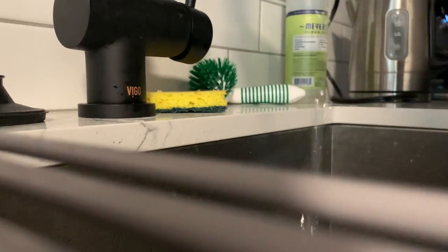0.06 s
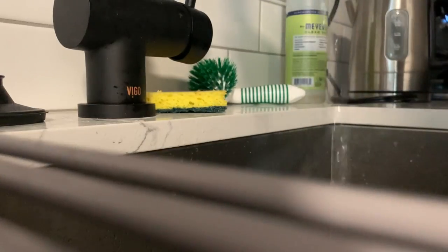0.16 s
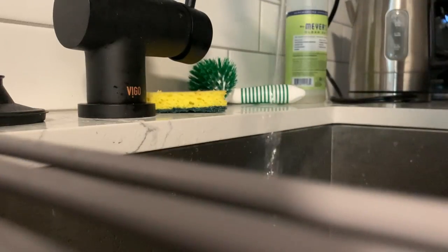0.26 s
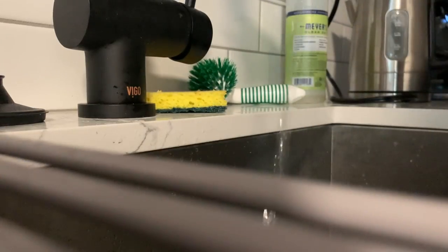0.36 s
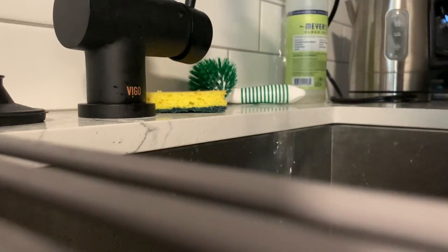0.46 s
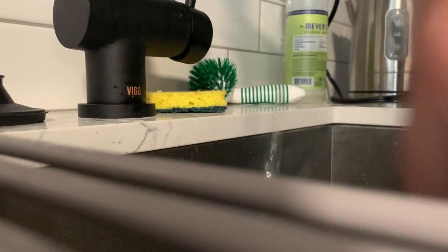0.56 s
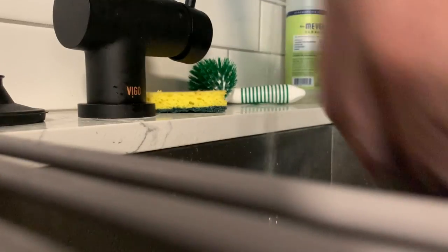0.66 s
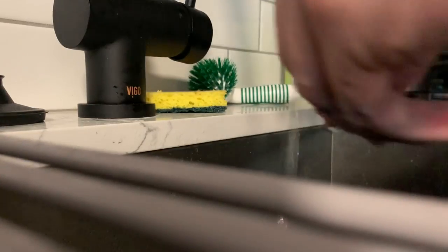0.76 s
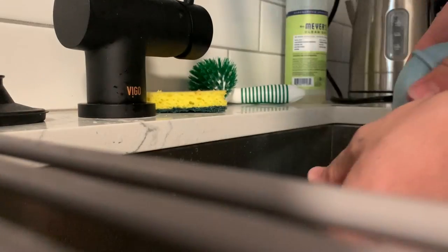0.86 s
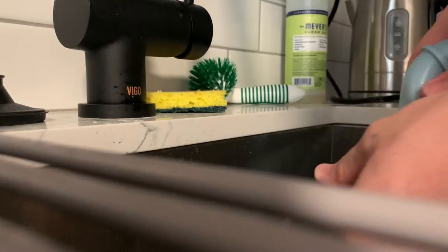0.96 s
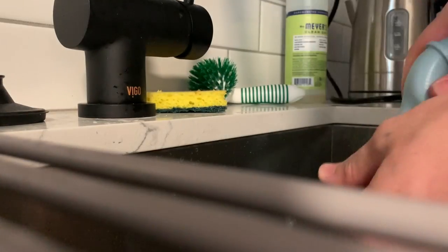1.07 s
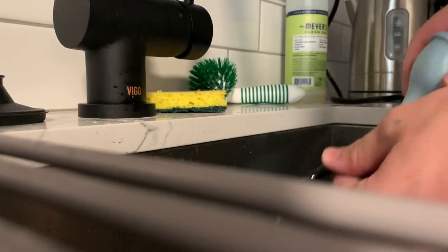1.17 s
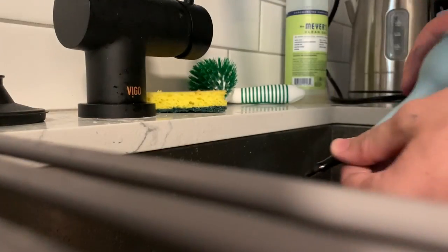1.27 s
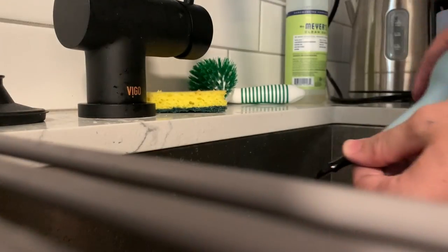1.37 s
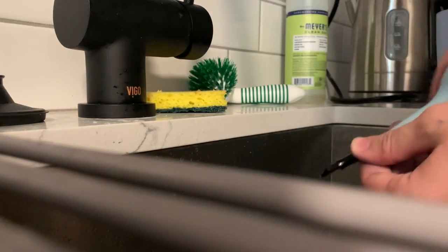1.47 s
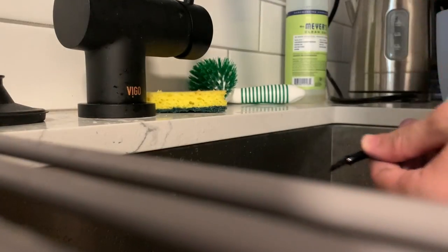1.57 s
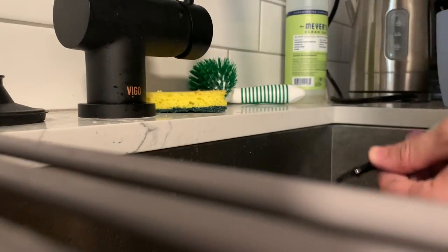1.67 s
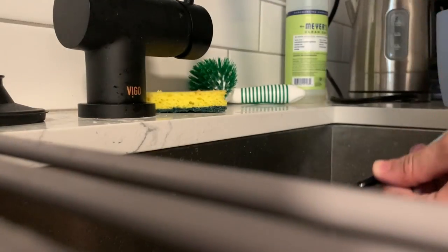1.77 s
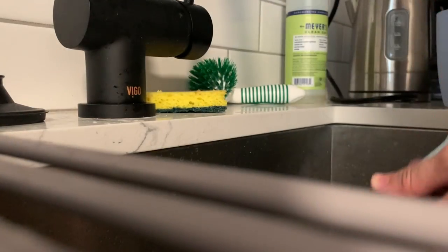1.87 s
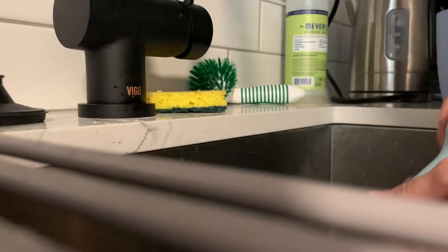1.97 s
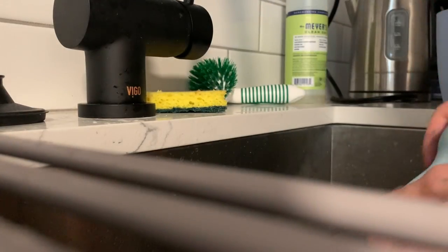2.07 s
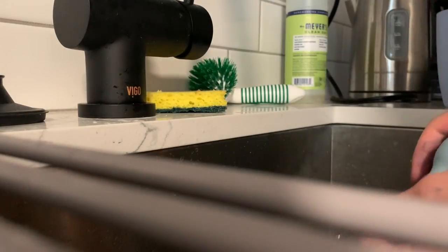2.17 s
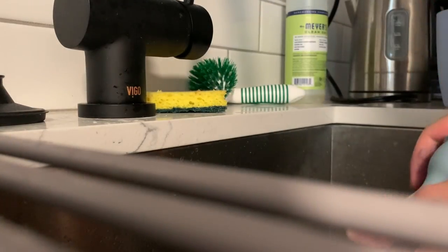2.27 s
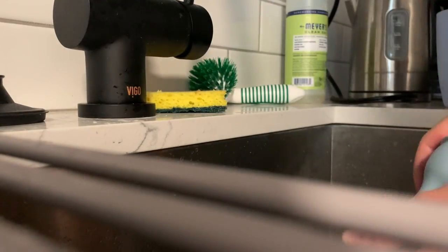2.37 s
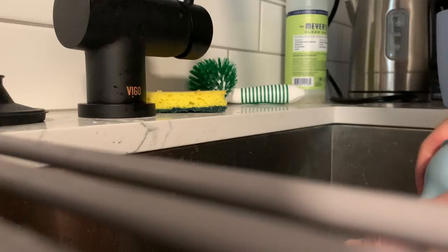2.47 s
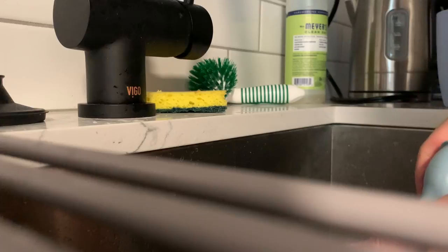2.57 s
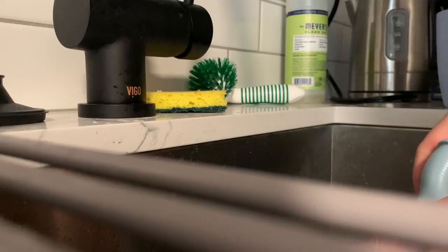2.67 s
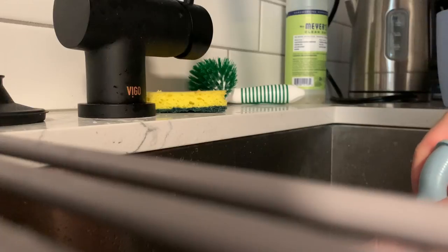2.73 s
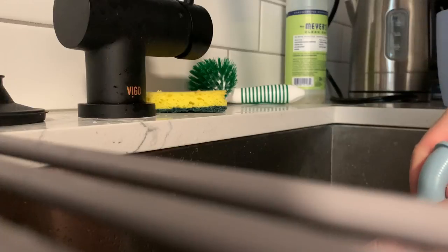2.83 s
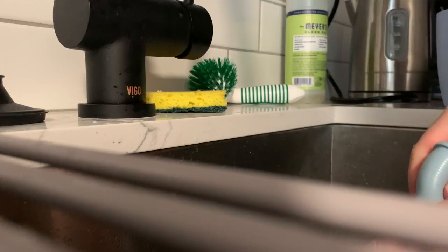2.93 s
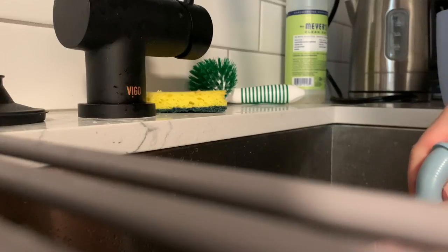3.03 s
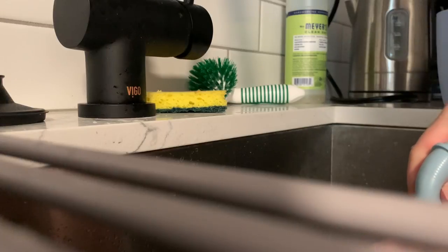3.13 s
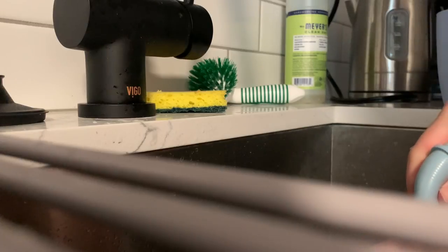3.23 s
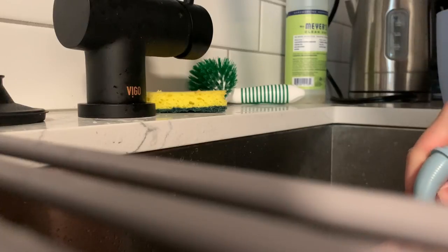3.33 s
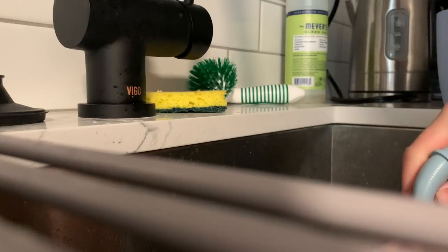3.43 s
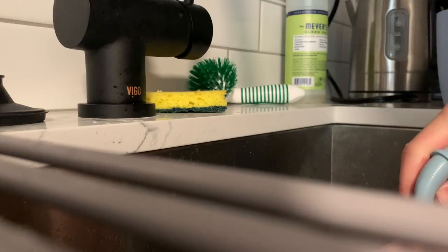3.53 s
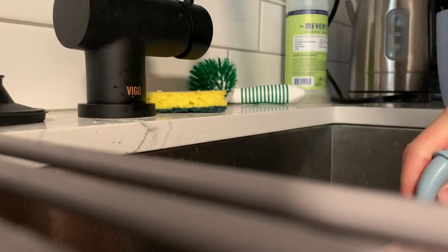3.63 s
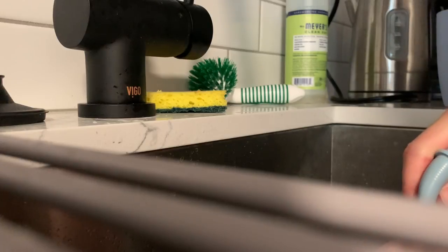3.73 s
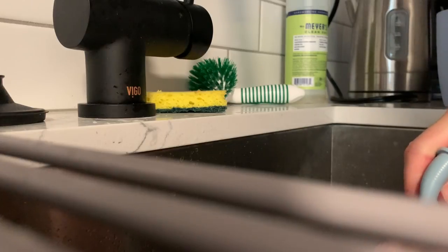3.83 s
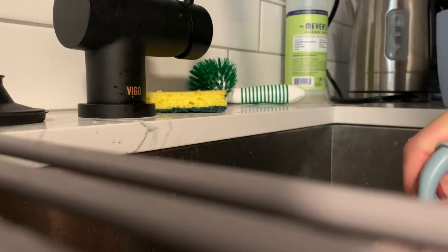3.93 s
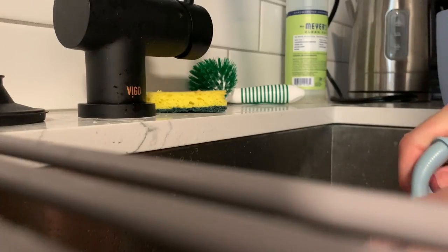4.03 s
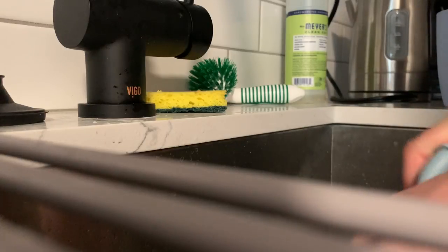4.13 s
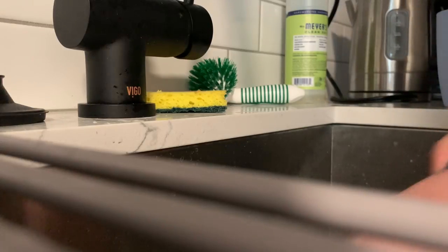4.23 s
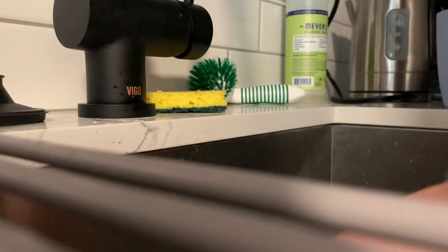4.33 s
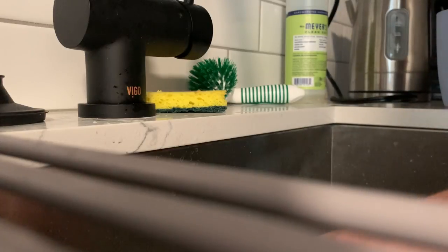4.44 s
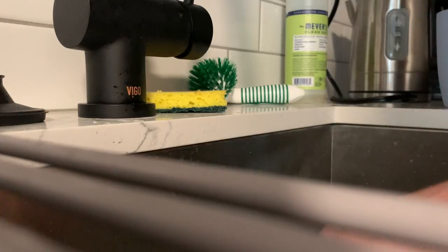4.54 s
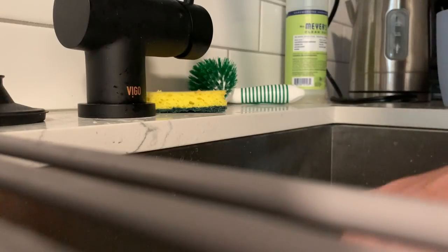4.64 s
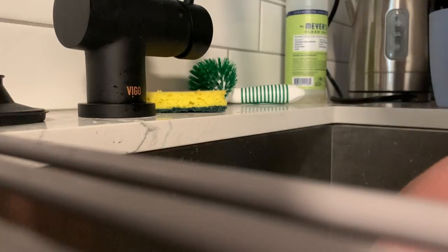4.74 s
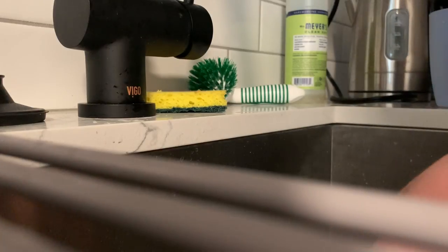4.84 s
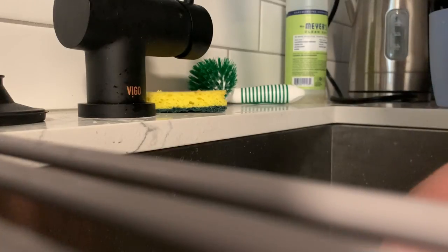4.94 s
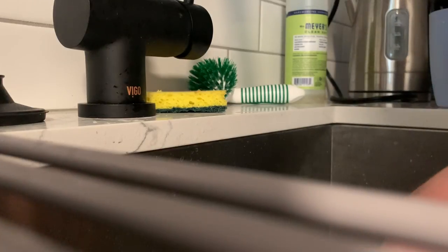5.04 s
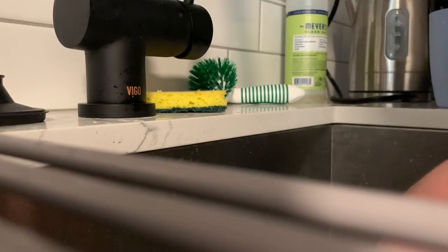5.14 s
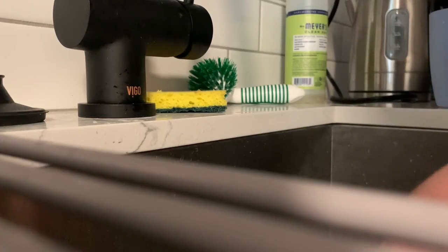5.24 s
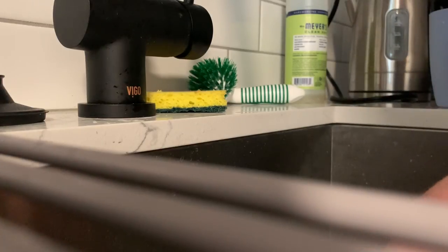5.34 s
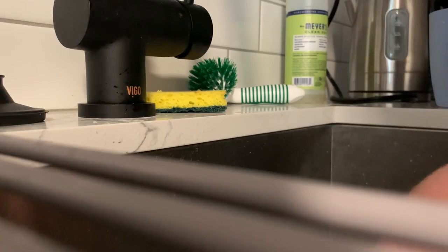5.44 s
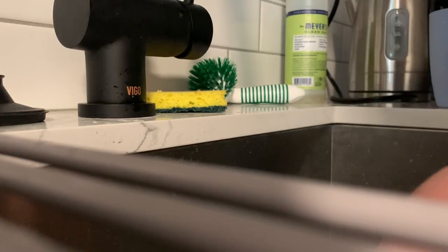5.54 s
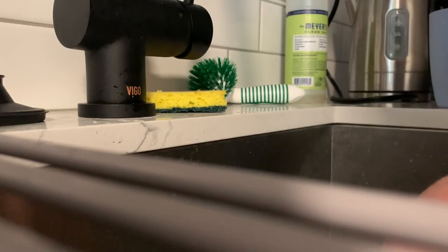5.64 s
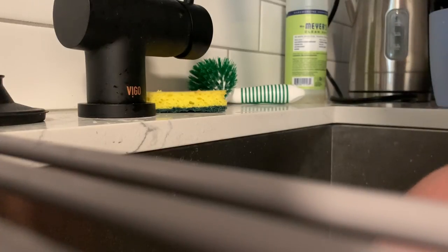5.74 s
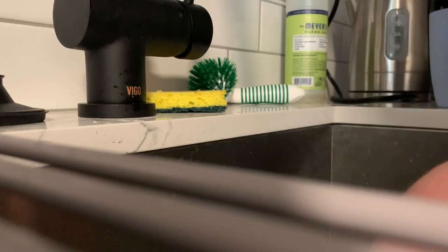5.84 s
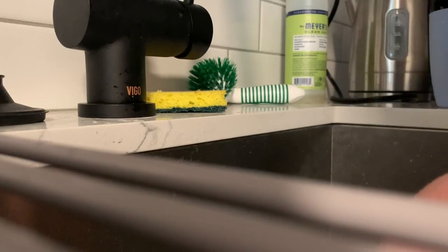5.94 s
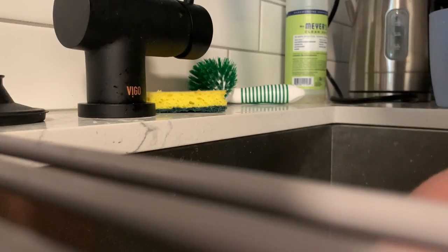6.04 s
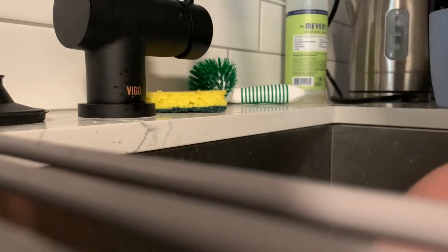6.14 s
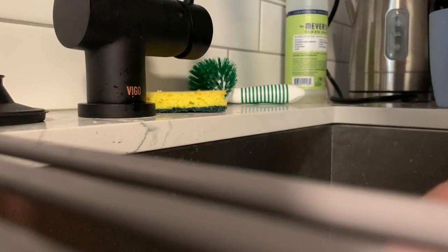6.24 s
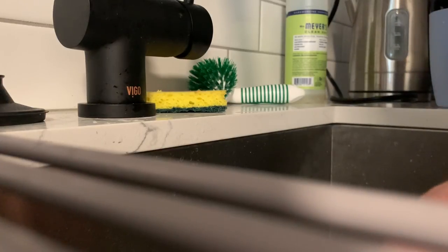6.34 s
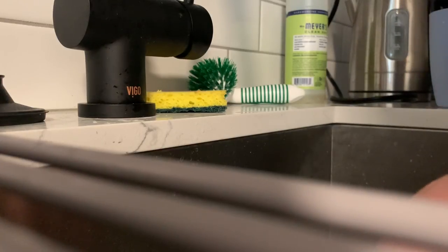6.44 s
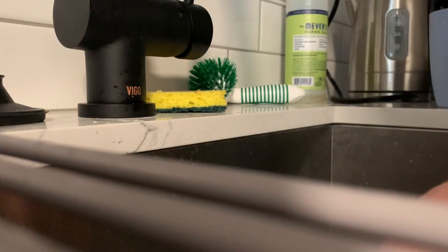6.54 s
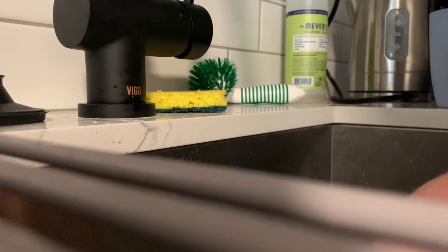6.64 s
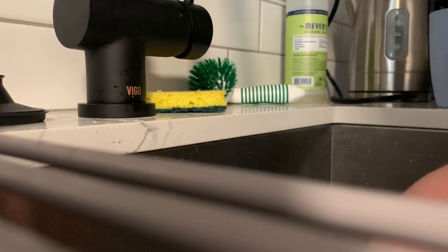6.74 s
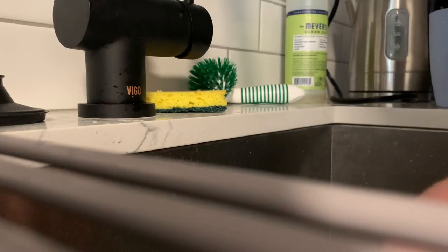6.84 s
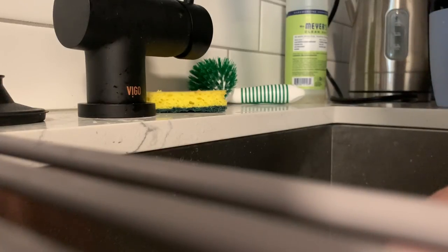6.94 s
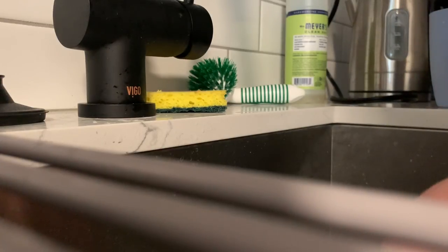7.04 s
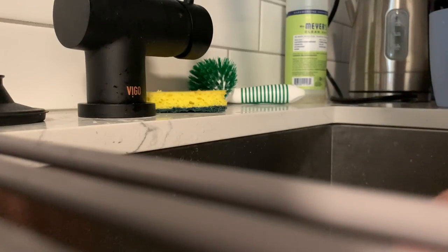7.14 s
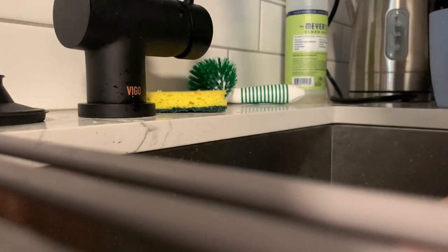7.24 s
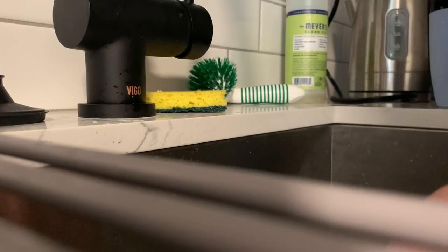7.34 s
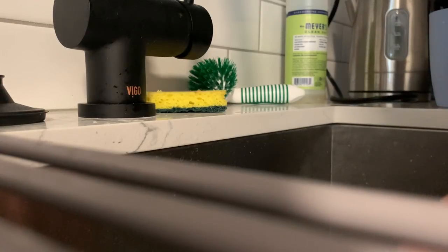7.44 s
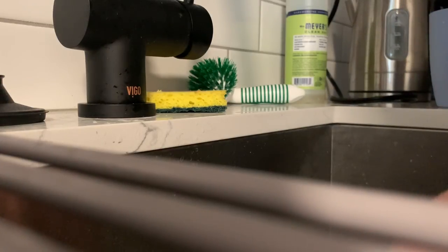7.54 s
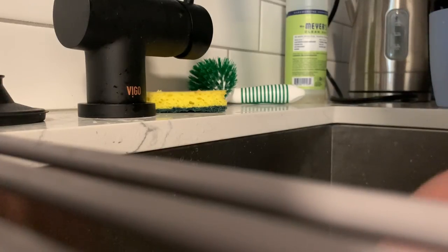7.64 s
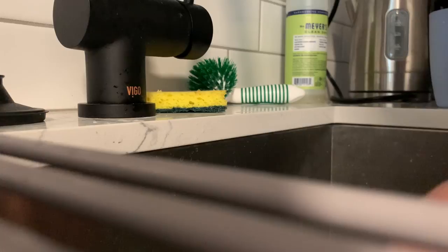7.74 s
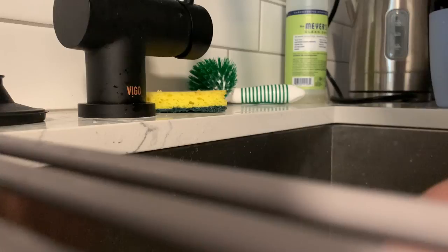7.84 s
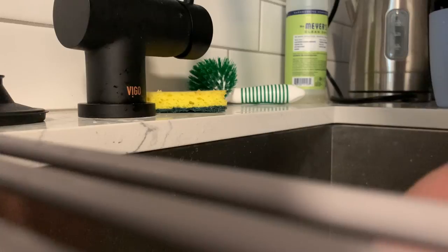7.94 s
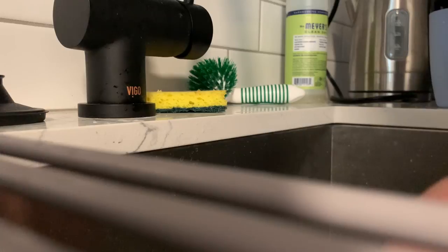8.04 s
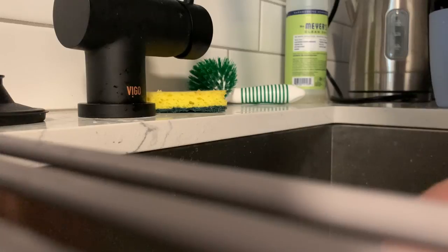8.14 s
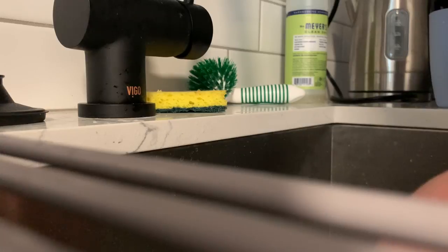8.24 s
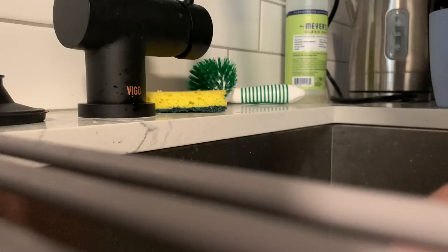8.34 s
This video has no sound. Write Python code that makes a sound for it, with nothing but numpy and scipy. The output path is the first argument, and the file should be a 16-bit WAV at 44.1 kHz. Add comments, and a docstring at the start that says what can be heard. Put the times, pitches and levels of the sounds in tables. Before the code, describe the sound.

Tap water splatters into a steel sink and stops abruptly, then a brush hisses in rough sweeps and settles into quick, regular scrubs with soft knocks.

```python
"""Scrubbing at a kitchen sink

Close on a steel sink in a tiled kitchen, stereo microphones, direct sound reaching the right one first.
Tap water splatters (drop blips, noise splashes, ringing bubbles); its sound ends abruptly before one second.
Something is scrubbed over the basin: hissing sweeps, one of them long, then quick scrubs (push, return,
flick), three a second, all made of grainy noise coloured by the basin's air resonances.
The work knocks the sink's panels, decaying sines that boom softly; filtered noise makes a low hum."""
import sys
import numpy as np
from scipy import signal
from scipy.fft import rfft, irfft
from scipy.io import wavfile
from scipy.ndimage import uniform_filter1d

SR = 44100
rng = np.random.default_rng(int(sys.argv[2]) if len(sys.argv) > 2 else 0)


def wav_out(sig):
    """Save sig, one row per channel (or a flat mono array), as 16-bit PCM at SR to the path in sys.argv[1]."""
    wavfile.write(sys.argv[1], SR, np.round(np.clip(np.atleast_2d(sig).T, -1, 1) * 32767).astype(np.int16))


N = 370436
TIME = np.arange(N) / SR  # (s)

# Levels in the tables are relative: each source adds its own gain.
# sweeps of the brush: (start [s], length [s], level [dB], easing off by the end [dB],
# lower hiss relative to the level [dB])
BRUSH_SWEEPS = [(1.247, 0.28, -47, 12, 2), (1.584, 0.08, -28, 5.5, -13), (1.683, 0.2, -22, 6.5, -10.5),
                (1.846, 0.09, -27.5, -0.5, -11), (2.056, 0.21, -32, 12, -4), (2.414, 0.02, -33, 3, 1.5),
                (2.499, 0.17, -24, 16, -11), (2.646, 0.024, -24, -2, -3.5)]
# pressure of the one long sweep: (time [s], level [dB])
LONG_SWEEP_PRESSURE = [(2.72, -35.5), (2.782, -24.5), (3.054, -22.5), (3.596, -26.5), (3.644, -23),
                       (3.854, -24.5), (4.038, -32.5), (4.052, -29.5), (4.12, -85)]
# hollow resonance under the long sweep: (time [s], pitch [Hz])
HOLLOW_PITCH = [(2.8, 2400), (3.3, 2500), (3.55, 2390), (3.95, 1890)]
# back-and-forth scrubs: (time of the push [s], push [dB], return after [s], return [dB], flick [dB],
# knock while pressing [dB], knock on lifting [dB])
SCRUB_CYCLES = [(5.12, -33, 0.074, -29.5, -63, -32.5, -63), (5.439, -32, 0.069, -29, -40, -33.5, -42.5),
                (5.771, -32, 0.066, -31.5, -41.5, -45.5, -42.5),
                (6.093, -32, 0.068, -32, -41.5, -35, -35.5), (6.413, -32, 0.064, -31, -50, -37.5, -43),
                (6.728, -30, 0.072, -32.5, -38, -35, -34.5), (7.035, -31, 0.065, -30.5, -56, -33.5, -55),
                (7.344, -32.5, 0.049, -31.5, -44.5, -29, -34.5),
                (7.636, -35.5, 0.048, -33.5, -56, -29.5, -29.5),
                (7.939, -34, 0.048, -33, -51, -30.5, -37.5), (8.244, -32.5, 0.064, -29, -48, -29, -42)]
# single strokes: (time of the peak [s], level [dB], rise [s], fall [s])
SINGLE_STROKES = [(4.189, -20, 0.013, 0.0081), (4.213, -40, 0.058, 0.023), (4.401, -44.5, 0.069, 0.0054),
                  (4.745, -36, 0.005, 0.037), (4.834, -28.5, 0.0092, 0.021)]
# light touches of the brush: (time [s], level [dB])
BRUSH_TOUCHES = [(0.953, -39.5), (0.994, -48), (1.148, -39.5), (1.606, -25), (2.4292, -25), (2.525, -25.5),
                 (4.74, -28.5), (5.183, -18), (5.824, -30), (5.894, -33), (6.068, -29), (7.761, -51),
                 (7.831, -54), (8.298, -41)]
# bristles that catch and snap free: (time [s], level [dB], pitch [Hz])
BRISTLE_SNAPS = [(1.3308, -24, 5000), (5.241, -26, 4280)]
# smooth colours of the brush: (frequency [Hz], density [dB per Hz])
SWEEP_SPECTRUM = [(100, -31), (280, -23), (370, -14), (450, -48), (560, -30), (750, -18), (1500, -23.5),
                  (2200, -15), (4000, -6), (7000, 2.5), (9000, -1.5), (12000, 0), (15500, 2)]
STROKE_SPECTRUM = [(100, -24), (280, -2.5), (370, -3), (450, -42.5), (560, -10.5), (750, -5), (1500, -15.5),
                   (2200, -12.5), (4000, -6), (7000, -6.5), (9000, 3), (12000, 1), (15500, -1)]
# air resonances of the basin, as each place of contact excites them; colour() limits lift and narrowness:
# (frequency [Hz], width [Hz], lift [dB])
SWEEP_RESONANCES = [(643, 47, 29), (851, 35, 8.2), (1047, 30, 8.5), (1310, 75, 36), (1525, 23, 24),
                    (1723, 74, 25.2), (2036, 73, 14.2), (2230, 45, 13), (2454, 110, 12), (2740, 140, 4.6),
                    (3220, 170, 4.1), (3490, 50, 1.1), (3720, 20, 5.1), (4480, 30, 9.2), (4844, 91, 3.8),
                    (5650, 35, 1.8), (6420, 350, 5.7), (8480, 200, 8.4), (9190, 960, 11), (9850, 100, 4.4),
                    (10550, 300, 13), (9900, 90, 2.9), (11330, 290, 10), (12820, 250, 7)]
STROKE_RESONANCES = [(637, 24, 15.3), (1089, 78, 21), (1330, 63, 12.8), (1550, 21, 1.3), (1682, 85, 14.4),
                     (1809, 39, 17), (2020, 84, 10.7), (2300, 570, 8.1), (2628, 110, 11.7),
                     (2835, 105, 4.3), (2912, 38, 19), (4020, 25, 8.5), (4530, 280, 4.5), (5020, 900, 7.8),
                     (6019, 51, 4.7), (6245, 72, 13), (6770, 310, 14.4), (7140, 120, 14.7), (7460, 88, 3.4),
                     (7950, 55, 8.1), (9600, 360, 2.4), (10010, 270, 4.2), (11210, 89, 2.5),
                     (14930, 75, 3.1)]
WATER_RESONANCES = [(620, 57, 6), (1330, 760, 3.5), (1892, 120, 8.5), (2336, 200, 19), (2900, 180, 5),
                    (3370, 220, 0.5)]
# strength of the falling water, with one lull: (time [s], level [dB])
WATER_FLOW = [(0, -29.5), (0.44, -27.5), (0.55, -37.5), (0.64, -38), (0.76, -38), (0.9, -25.5)]
# big drops: (time [s], fine spray [dB], slap on the steel [dB])
BIG_DROPS = [(0.0034, -9.5, -22), (0.0385, -25.5, -27.5), (0.0887, -38.5, -29), (0.121, -17, -26),
             (0.166, -35, -20), (0.2155, -29.5, -24), (0.235, -19, -30), (0.268, -16, -30),
             (0.306, -14.5, -22), (0.387, -10, -31), (0.5085, -10, -14.5), (0.582, -33, -28.5),
             (0.698, -17.5, -45.5), (0.7214, -14, -33), (0.754, -14.5, -24.5), (0.7734, -10.5, -41),
             (0.831, -15.5, -35), (0.9104, -15.5, -20)]
# large air bubbles: (time [s], level [dB], starting pitch [Hz])
LARGE_BUBBLES = [(0.06, -21, 770), (0.102, -9.5, 3180), (0.167, -22, 641), (0.263, -11, 1330),
                 (0.417, -19, 1310), (0.428, -8.5, 2900), (0.479, -12.5, 2984), (0.58, -8, 2300),
                 (0.884, -13.5, 2250)]
# smooth colours of the water and of the drumming floor: (frequency [Hz], density [dB per Hz])
WATER_SPECTRUM = [(100, -33), (280, 7), (500, 1.5), (800, 3), (2400, 0.5), (4000, 4.5), (6500, 4.5),
                  (8700, 9.5), (12000, 1), (15500, 2.5)]
DRUM_SPECTRUM = [(25, -44.5), (45, -15.5), (65, 4), (88, -11), (112, -1), (145, -18), (195, -11),
                 (280, -29), (500, -32), (2000, -89.5)]
# stray knocks on the sink: (time [s], level [dB], deep thud [dB])
STRAY_KNOCKS = [(0.604, -21.5, -51), (0.624, -39, -52), (0.648, -23.5, -45), (1.081, -36.5, -46),
                (2.122, -38, -37), (2.957, -36, -70), (4.223, -37, -49), (4.32, -31, -31.5),
                (4.369, -37.5, -33.5), (4.417, -55, -32), (4.787, -29.5, -48.5), (7.533, -39.5, -58)]
# modes of the sink's panels: (frequency [Hz], level [dB], t60 [s])
PANEL_MODES = [(199.2, 2, 0.13), (230.2, 0.5, 0.076), (250, -11.5, 0.084), (356.6, -25.5, 0.11)]
# smooth colour of the hum: (frequency [Hz], density [dB per Hz])
HUM_SPECTRUM = [(15, -38), (25, -23.5), (48, -8), (64, -5.5), (87, -11), (130, -8), (153, -14),
                (180, -21.5), (293, -24), (560, -36), (1020, -31), (1330, -37), (10400, -61.5),
                (16000, -77)]
# decay of the kitchen: (frequency [Hz], t60 [s])
KITCHEN_DECAY = [(200, 0.3), (1000, 0.26), (4000, 0.26), (9000, 0.2), (16000, 0.29)]
# stereo width, held to 0 dB at most: (frequency [Hz], side gain [dB])
STEREO_WIDTH = [(60, -10.5), (130, -7), (260, -2.5), (500, 0), (900, 24.5), (7400, 26.5), (9000, -4),
                (11400, -5.5), (12000, -63)]

SWEEP_ATTACK_S, SWEEP_RELEASE_T60 = 0.039, 0.092
LONG_SWEEP_DB, LONG_LOW_DB = -1.5, -12.5  # gain, and the lower hiss relative to it
HOLLOW_PEAK_S, HOLLOW_FADE_DB_PER_S = 3.42, 18  # the fade runs both ways from mid-sweep
CHATTER_HZ, CHATTER_WANDER, CHATTER_DB = 64.6, 0.17, 0.85  # mean rate, its rms share of wander, swing
PUSH_S, RETURN_S, FLICK_S = (0.033, 0.031), (0.014, 0.014), (0.011, 0.0054)  # (rise [s], fall [s])
FLICK_SHARE = 0.97  # the flick follows the return by this share of the time from push to return
# knocks within a scrub: landing and pressing before the push, turning before the return, lifting after it
LAND_LEAD_S, PRESS_LEAD_S, TURN_LEAD_S, LIFT_LAG_S = 0.045, 0.0117, 0.01226, 0.08
LAND_DB, PRESS_DB, TURN_DB = 0.5, -0.5, -3  # relative to the pressing knock in the table
SCRUB_THUD_DB = -14.5  # deep thud relative to its knock
WATER_END_S = .935
MIC_LAG = 11  # delay of the left microphone (samples)
EDGE_HZ = 15800  # upper band limit


def sweeps(high_db=1, low_db=1, hollow_db=-8.0, hollow_width_hz=450, grain_db=1.5, drag_db=1.32):
    """Many bristles slip at once: a grainy hiss, with a hollow note that sinks late in the longest sweep."""
    grain = amp(grain_db * flutter(550) + drag_db * flutter(39) + chatter())
    rasp = patchy(hiss(direct=.4), depth_db=2.2, width_hz=170, length_s=.08)
    low, high = split(colour(rasp * grain, SWEEP_SPECTRUM, SWEEP_RESONANCES), 3620)
    force, low_force = sweep_force()
    pitch = np.interp(TIME, *np.transpose(HOLLOW_PITCH))
    once = resonate(hiss(), pitch, hollow_width_hz)
    hollow = unit(resonate(once, pitch, hollow_width_hz))
    hollow *= long_force() * amp(hollow_db - HOLLOW_FADE_DB_PER_S * abs(TIME - HOLLOW_PEAK_S))
    return amp(high_db) * force * unit(high) + amp(low_db) * low_force * unit(low) + hollow


def sweep_force():
    """Each sweep bites, eases off and lets go: gains of the hiss and of its lower part."""
    t = TIME[:SR // 2]
    high = long_force()
    low = amp(LONG_LOW_DB) * high
    for s, length, db, ease_db, low_db in BRUSH_SWEEPS:
        bite = np.minimum(t / SWEEP_ATTACK_S, 1) ** 2
        easing_db = ease_db * np.minimum(t / length, 1)
        release_db = 60 * np.maximum(t - length, 0) / SWEEP_RELEASE_T60
        force = bite * amp(db - easing_db - release_db)
        add(high, s, force)
        add(low, s, amp(low_db) * force)
    return high, low


def long_force():
    """Pressure of the long sweep, as a gain."""
    return amp(LONG_SWEEP_DB + np.interp(TIME, *np.transpose(LONG_SWEEP_PRESSURE), left=-120, right=-120))


def chatter():
    """Dragged bristles stick and slip at a wandering rate: a level swing in dB."""
    rate_hz = CHATTER_HZ * (1 + CHATTER_WANDER * flutter(12))
    return CHATTER_DB * np.sin(2 * np.pi * np.cumsum(rate_hz) / SR)


def strokes(level_db=0, grain_db=2.0):
    """Quick scrubbing and light touches: grainy hiss whose tone shifts from moment to moment."""
    rasp = patchy(hiss(direct=.3), depth_db=3.3, width_hz=180, length_s=.035)
    rasp = unit(rasp * amp(grain_db * flutter(320)))
    force = np.hypot(stroke_force(), touches())
    return amp(level_db) * colour(force * rasp, STROKE_SPECTRUM, STROKE_RESONANCES)


def stroke_force():
    """Each short stroke swells and fades as the brush speeds up and stops."""
    power = np.zeros(N)
    t = np.arange(-SR // 5, SR // 5) / SR
    for s, db, rise, fall in [*SINGLE_STROKES, *scrub_strokes()]:
        swell = np.exp(-2 * (t / np.where(t < 0, rise, fall)) ** 2)
        add(power, s + t[0], amp(db) ** 2 * swell)
    return np.sqrt(power)


def scrub_strokes():
    """A scrub is a slow push, a quicker return and a short flick: rows like the single strokes."""
    for s, push_db, gap, return_db, flick_db, _, _ in SCRUB_CYCLES:
        yield s, push_db, *PUSH_S
        yield s + gap, return_db, *RETURN_S
        yield s + gap * (1 + FLICK_SHARE), flick_db, *FLICK_S


def touches(level_db=-3, t60=0.063):
    """The bristles land with a soft tick: decaying gains for the stroke hiss."""
    force = np.zeros(N)
    for s, db in BRUSH_TOUCHES:
        add(force, s, amp(db + level_db - 60 * TIME[:SR // 5] / t60))
    return force


def snaps(level_db=0, t60=0.067, overtone_hz=7300, overtone_db=-3, width_hz=1500):
    """A caught bristle springs free: a short, rough burst of noise through two resonances."""
    t, out = TIME[:SR // 6], np.zeros((2, N))
    for s, db, hz in BRISTLE_SNAPS:
        noise = rng.standard_normal((2, len(t)))
        first, second = (unit(resonate(resonate(noise, f, width_hz), f, width_hz)) for f in (hz, overtone_hz))
        envelope = amp(db + level_db - 60 * t / t60) * (1 - np.exp(-t / 0.00099))
        add(out, s, envelope * (first + amp(overtone_db) * second))
    return kitchen(out, wet_db=-13.5)


def tap(drum_db=-32, after_db=-15):
    """Splatter, bubbles and the drumming of the sink's floor end at once, leaving a faint echo."""
    sinking = amp(-4 * np.minimum(TIME, 1) + 1)  # loses 4 dB over the first second
    drum = amp(drum_db) * colour(hiss(direct=0.92), DRUM_SPECTRUM, [(364, 20, 21)]) * sinking
    water = colour(drops() + splashes(), WATER_SPECTRUM, WATER_RESONANCES) + bubbles()
    running = np.clip((WATER_END_S - TIME) / 0.00081, 0, 1)
    echo_gain = np.maximum(running, amp(after_db))
    return kitchen(water * running, wet_db=-12.0) * echo_gain + drum * running


def drops(count=36, per_s=22, spread_db=5, cycles=4, drops_db=-5):
    """Each droplet is a decaying blip of a few cycles, scattered by the steel walls, over a faint wash."""
    t, out = TIME[:SR // 25], np.zeros((2, N))
    for hz in np.geomspace(600, 15000, count):
        chance = per_s * np.sqrt(hz / 3000) / SR  # high blips come more often; per_s holds at 3 kHz
        size = amp(spread_db * np.minimum(rng.exponential(1, SR), 3)) * (rng.random(SR) < chance)
        blip = unit(np.exp(-t * hz / cycles) * np.sin(2 * np.pi * hz * t)) * hz ** .25
        walls = rng.standard_normal((2, len(t))) * amp(-60 * t / 0.03)
        path = ports(1. * (t == 0)) + walls / np.linalg.norm(walls[0])
        blips = signal.fftconvolve(size, blip)
        add(out, 0, signal.fftconvolve(blips[None], path, axes=1))
    wash = amp(-13) * hiss()
    flow = amp(drops_db + np.interp(TIME, *np.transpose(WATER_FLOW)))
    return flow * (out / np.std(out[:, :SR]) + wash)


def splashes(t60=0.067, crack_t60=0.0087, spray_db=-10, slap_db=-6):
    """Each big drop cracks on the steel and scatters into spray: bursts of low and high noise."""
    t, out = TIME[:SR // 10], np.zeros((2, N))
    spray_shape = amp(-60 * t / t60) + amp(-60 * t / crack_t60)
    low, high = split(patchy(hiss(), depth_db=3, width_hz=700, length_s=.03), 5000)
    for k, (s, high_db, low_db) in enumerate(BIG_DROPS):
        slap, spray = (unit(band[:, k * len(t):][:, :len(t)]) for band in (low, high))
        spray = amp(high_db + spray_db) * spray_shape * spray
        slap = amp(low_db + slap_db - 60 * t / 0.12) * slap
        add(out, s, spray + slap)
    return out


def bubbles(count=90, small_db=-29, spread_db=5, rise=0.13, gain_db=2):
    """Trapped air rings briefly, rising in pitch as it nears the surface."""
    when, size, pitch = rng.random((count, 3)).T
    levels_db = small_db + spread_db * (2 * size - 1) - 6 * when  # later ones are fainter
    small = np.transpose([when * WATER_END_S, levels_db, 650 * 11 ** pitch])
    t, out = TIME[:SR // 8], np.zeros(N)
    for s, db, hz in np.vstack([LARGE_BUBBLES, small]):
        age = t * hz / 42  # the ring loses 60 dB in 42 periods of its starting pitch
        envelope = amp(db + gain_db - 60 * age) * (1 - np.exp(-t / 0.0021))
        cycles = hz * t * (1 + rise * np.minimum(age, 2) / 2)
        add(out, s, envelope * np.sin(2 * np.pi * cycles))
    return basin(out, t60=0.066, wet_db=5)


def panels(knock_db=5, thud_db=2, thud_hz=112, thud_t60=0.23, push_s=0.0089, rub_db=-9, sweep_rub_db=-29):
    """Soft knocks and the rubbing itself ring the sink's panels, a sum of decaying modes."""
    t, out = TIME[:SR // 3], np.zeros(N)
    ring = sum(amp(db - 60 * t / t60) * np.sin(2 * np.pi * hz * t) for hz, db, t60 in PANEL_MODES)
    thud = amp(thud_db - 60 * t / thud_t60) * np.sin(2 * np.pi * thud_hz * t)
    push = 1 - np.exp(-(t / push_s) ** 2)  # soft onset
    for s, db, deep_db in [*STRAY_KNOCKS, *scrub_knocks()]:
        add(out, s, push * (amp(db + knock_db) * ring + amp(deep_db) * thud))
    stroke_rub = amp(rub_db) * np.minimum(stroke_force(), amp(-40.5))  # strong strokes are held level
    sweep_rub = amp(sweep_rub_db) * sweep_force()[0]
    rub = (stroke_rub + sweep_rub) * rng.standard_normal(N)
    return ports(out + signal.oaconvolve(rub, ring / np.linalg.norm(ring))[:N])


def scrub_knocks():
    """The brush knocks the sink as it lands, presses, turns and lifts: rows like the stray knocks."""
    for s, _, gap, _, _, knock_db, lift_db in SCRUB_CYCLES:
        for when, db in ((s - LAND_LEAD_S, knock_db + LAND_DB),
                         (s - PRESS_LEAD_S, knock_db + PRESS_DB),
                         (s + gap - TURN_LEAD_S, knock_db + TURN_DB),
                         (s + gap + LIFT_LAG_S, lift_db)):
            yield when, db, db + SCRUB_THUD_DB


def hum(level_db=-50):
    """The kitchen's steady low rumble: noise coloured mostly below 200 Hz."""
    return amp(level_db) * colour(hiss(direct=0.81), HUM_SPECTRUM)


def basin(x, t60=.05, wet_db=0):
    """Direct sound and the quick echoes between the steel walls, as decaying noise."""
    t = TIME[:SR // 8]
    taps = rng.standard_normal((2, len(t))) * amp(-60 * t / t60) * (t > .001)
    echoes = signal.oaconvolve(x[None], taps / np.linalg.norm(taps[0]), axes=1)[:, :N]
    return (ports(x) + amp(wet_db) * echoes) / np.hypot(1, amp(wet_db))


def kitchen(x, wet_db):
    """Adds the room's tail, each band dying at its own speed."""
    hz, t, z = signal.stft(rng.standard_normal((2, SR // 2)), SR, nperseg=256)
    decay = amp(-60 * t / read(KITCHEN_DECAY, hz)[:, None])
    tail = signal.istft(z * decay, SR, nperseg=256)[1]
    tail[:, :SR // 200] = 0  # no echo in the first 5 ms
    return x + amp(wet_db) * signal.oaconvolve(x, tail / np.linalg.norm(tail[0]), axes=1)[:, :N]


def ports(x):
    """The direct path reaches the right microphone first."""
    return np.array([np.roll(x, MIC_LAG), x])


def hiss(direct=0.082):
    """Stereo noise: part direct, part scattered by the basin's walls."""
    direct = np.clip(direct, 0, 1)
    return np.sqrt(direct) * ports(rng.standard_normal(N)) + np.sqrt(1 - direct) * rng.standard_normal((2, N))


def patchy(x, depth_db, width_hz, length_s):
    """Resonances come and go as the place of contact moves: smooth random gains over time and pitch."""
    z = signal.stft(x, SR, nperseg=512, noverlap=384)[2]
    field = rng.standard_normal(z.shape)
    for _ in range(2):
        field = uniform_filter1d(field, max(round(width_hz * 2 ** 9 / SR), 1), axis=1)
        field = uniform_filter1d(field, max(round(length_s * SR / 2 ** 7), 1), axis=2)
    gain = unit(amp(depth_db * np.clip(unit(field), -2, 2)))
    return signal.istft(z * gain, SR, nperseg=512, noverlap=384)[1][:, :N]


def colour(x, spectrum, modes=()):
    """Minimum-phase filter of unit power: a smooth spectrum lifted by resonances."""
    hz = abs(np.fft.fftfreq(2 ** 13, 1 / SR))
    db = read(spectrum, hz)
    for f, width, lift in modes:  # lift is held to 12 dB, and no mode is too narrow
        db = db + min(lift, 12) / (1 + (2 * (hz - f) / max(width, 30 + f / 70)) ** 2)
    response = np.exp(np.conj(signal.hilbert(np.log(amp(db)))))
    taps = np.fft.ifft(response).real[:len(hz) // 2]
    power = np.mean(amp(db) ** 2 * (hz < EDGE_HZ))
    return signal.oaconvolve(x, taps[None] / np.sqrt(power), axes=1)[:, :N]


def resonate(x, hz, width):
    """A one-pole resonance of gain one, width in Hz, that follows a pitch curve."""
    turn = np.exp(2j * np.pi * np.cumsum(hz * np.ones(x.shape[-1])) / SR)
    r = np.exp(-np.pi * width / SR)
    return 2 * (turn * signal.lfilter([1 - r], [1, -r], x / turn)).real


def split(x, hz):
    """The parts of a sound below and above a frequency."""
    filters = [signal.butter(2, hz, kind, fs=SR, output="sos") for kind in ("low", "high")]
    return [signal.sosfilt(sos.repeat(2, axis=0), x) for sos in filters]  # each runs twice


def flutter(rate_hz):
    """Slow random wobble of rms one: noise rolled off above a rate."""
    lowpass = 1 + (np.fft.rfftfreq(N, 1 / SR) / rate_hz) ** 4
    return unit(irfft(rfft(rng.standard_normal(N)) / lowpass, N))


def amp(db):
    """Decibels to gain."""
    return 10 ** (np.asarray(db) / 20)


def unit(x):
    """Scales to an rms of one."""
    return x / np.sqrt(np.mean(x ** 2) + 1e-20)


def read(points, hz):
    """Reads a table along a log-frequency axis."""
    f, value = np.transpose(points)
    return np.interp(np.log(hz + 1), np.log(f + 1), value)


def add(mix, s, sound):
    """Adds a sound at a time in seconds."""
    part = mix[..., max(round(s * SR), 0):][..., :sound.shape[-1]]
    part += sound[..., :part.shape[-1]]


def scene():
    """Water, then scrubbing, in one kitchen."""
    brush = kitchen(sweeps(), wet_db=-3.5) + kitchen(strokes(), wet_db=-9.5) + snaps()
    return tap() + brush + kitchen(panels(), wet_db=-8) + hum()


def record(dry, balance_db=0.18):
    """The stereo image narrows in the bass and closes to mono in the top treble; then the band limit."""
    hz = np.fft.rfftfreq(N, 1 / SR)
    width = np.minimum(amp(read(STEREO_WIDTH, hz)), 1)
    treble = hz > 2000
    mid = irfft(rfft(dry.mean(0)) * np.sqrt(1 + treble * (1 - width ** 2)), N)  # makes up lost treble power
    side = irfft(rfft(dry[0] - dry[1]) / 2 * width, N)
    pair = np.array([amp(balance_db) * (mid + side), amp(-balance_db) * (mid - side)])
    # the microphones shed the deepest rumble
    pair = signal.sosfilt(signal.butter(4, 38, "high", fs=SR, output="sos"), pair)
    band_limit = signal.firwin(511, EDGE_HZ, window=("kaiser", 9), fs=SR)
    return signal.oaconvolve(pair, band_limit[None], "same")


dry = scene()
out = record(dry)
wav_out(out)
```